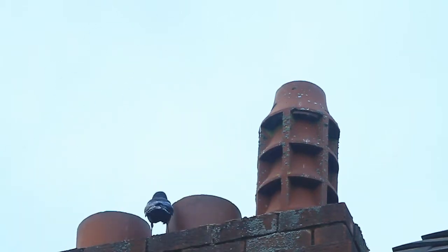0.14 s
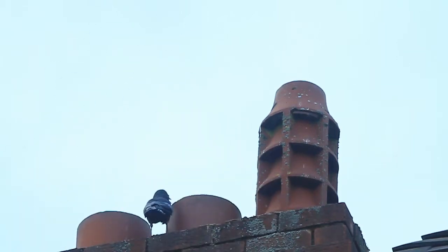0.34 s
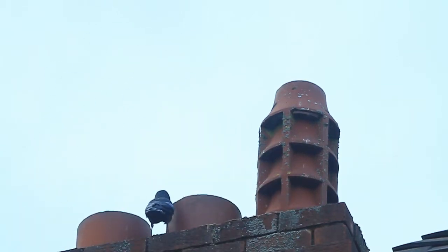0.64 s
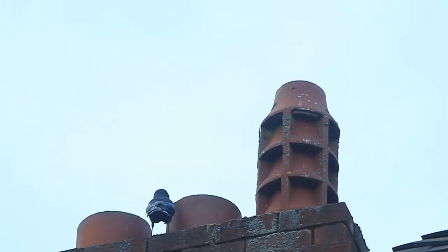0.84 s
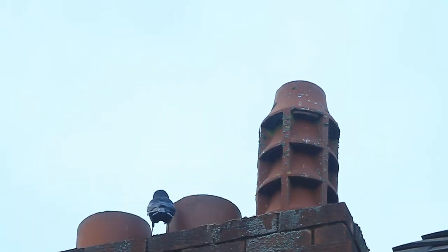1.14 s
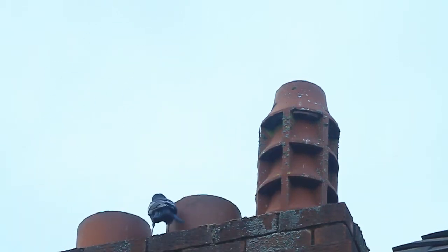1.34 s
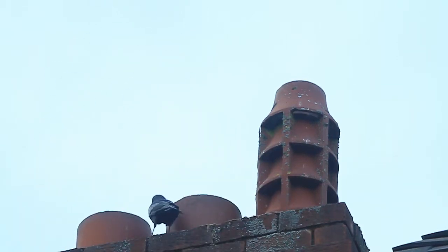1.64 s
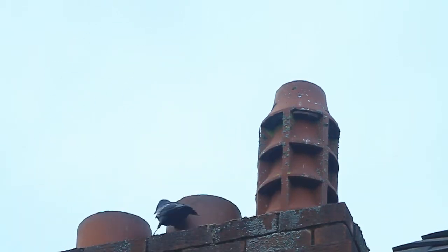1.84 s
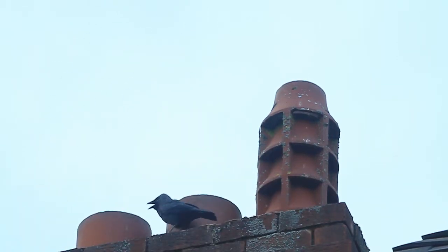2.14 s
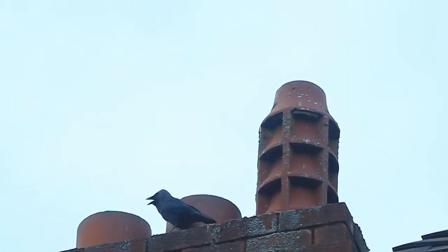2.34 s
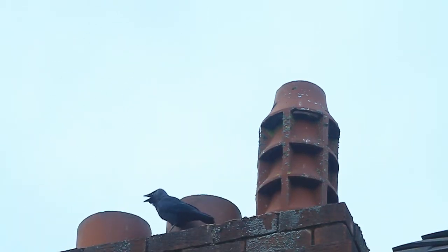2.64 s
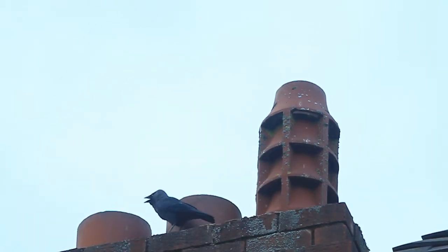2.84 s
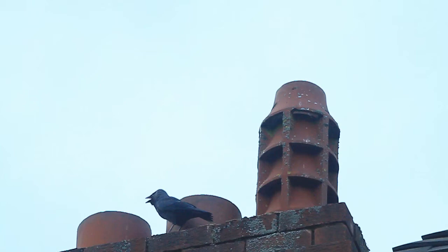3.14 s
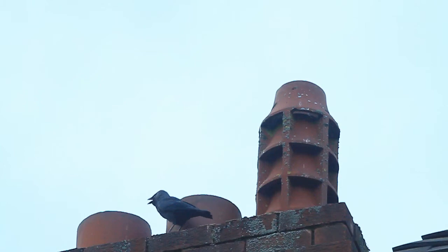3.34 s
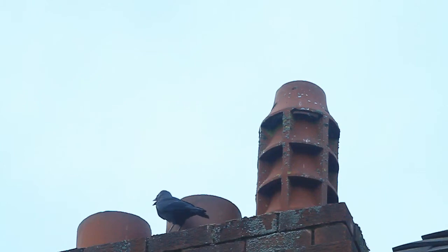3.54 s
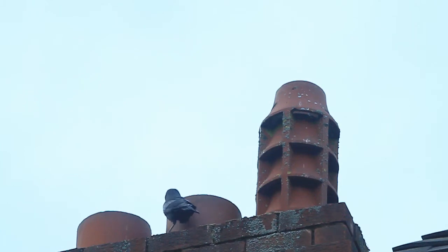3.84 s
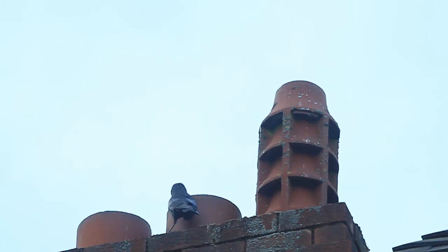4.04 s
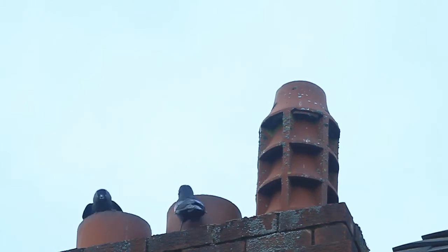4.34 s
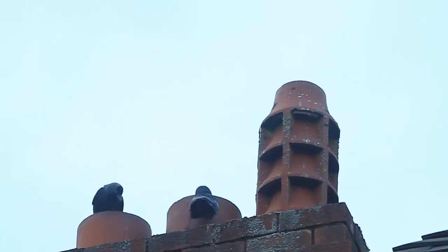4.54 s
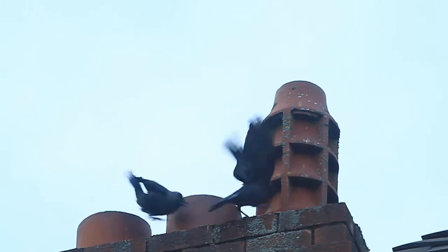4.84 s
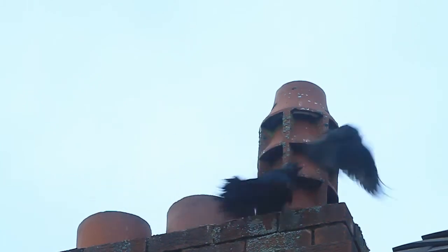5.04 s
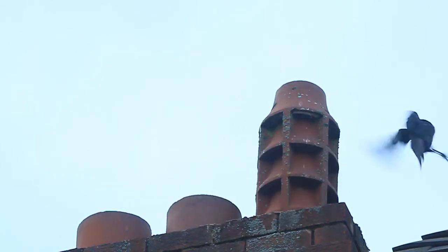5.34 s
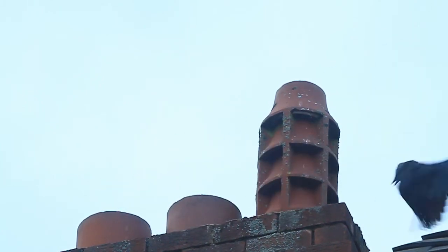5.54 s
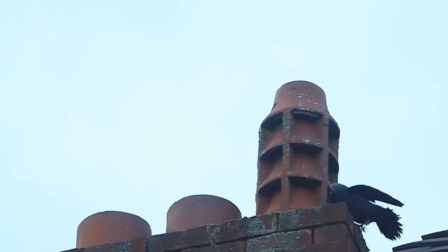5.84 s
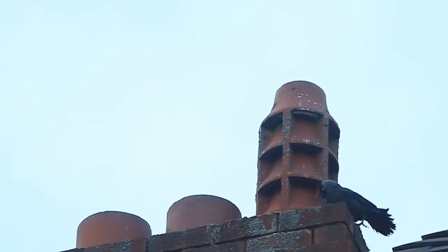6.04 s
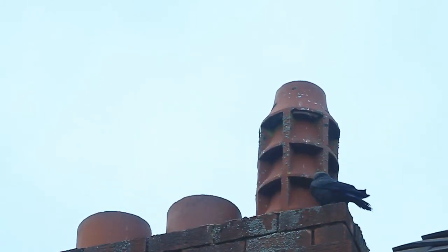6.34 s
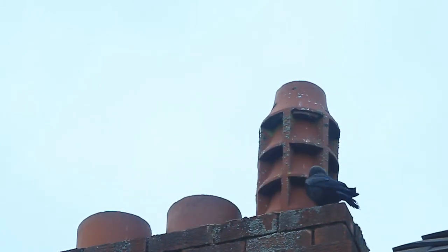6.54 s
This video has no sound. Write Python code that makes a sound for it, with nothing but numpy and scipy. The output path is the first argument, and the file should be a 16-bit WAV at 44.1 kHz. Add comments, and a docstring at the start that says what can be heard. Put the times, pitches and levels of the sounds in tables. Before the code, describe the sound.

Jackdaws squabble on a rooftop chimney. Sharp, fairly close calls plunge in pitch and turn harsh, answered by softer yelps and more distant nasal calls. Small birds whistle far off, mostly at the start, and one soft dull thump sounds early. Later, wings clap and feathers rustle briefly before a last sharp call. House walls add a light echo over a faint town murmur.

```python
"""Jackdaws on a chimney stack

Jackdaws squabble: sharp calls plunge in pitch and turn harsh, answered by softer yelps. Each call is
a pulse train from the syrinx, filtered by throat and beak. There is one dull thump; later, wings clap
and rustle as the birds chase each other off and land. House walls reflect the calls, and small birds
whistle far off over the murmur of a town."""
import sys
import numpy as np
from scipy import signal
from scipy.fft import rfft, irfft
from scipy.io import wavfile
from scipy.ndimage import uniform_filter1d, map_coordinates

SR = 44100
rng = np.random.default_rng(int(sys.argv[2]) if len(sys.argv) > 2 else 0)


def store_pcm(level_fs):
    """Save levels as 16-bit WAV."""
    pcm = np.round(np.clip(level_fs, -1, 1) * 32767).astype(np.int16)
    wavfile.write(sys.argv[1], SR, np.atleast_2d(pcm).T)


N = 294588
TIME = np.arange(N) / SR
CUTOFF_HZ = 15750


def from_db(db):
    """Amplitude ratio of a level in decibels."""
    return 10 ** (np.asarray(db) / 20)


def rms_one(x):
    """Normalisation to unit mean power."""
    return x / np.sqrt(np.mean(x ** 2) + 1e-20)


def colour(x, spectrum, size=4096):
    """Minimum-phase filter by cepstral folding; spectrum rows are (frequency [Hz], gain [dB])."""
    hz, db = np.transpose(spectrum)
    bins_hz = np.fft.rfftfreq(size, 1 / SR)
    gain = from_db(np.interp(np.log(bins_hz + 1), np.log(hz), db))
    cepstrum = irfft(np.log(gain))
    cepstrum[1:size // 2] *= 2
    cepstrum[size // 2 + 1:] = 0
    return signal.fftconvolve(x, irfft(np.exp(rfft(cepstrum))))[:len(x)]


def gliding_colour(x, spectrum, scale):
    """Time warping: filtering on a stretched clock multiplies every resonance by a moving scale."""
    clock = np.cumsum(scale) - scale[0]
    positions = np.interp(np.arange(clock[-1] + 1), clock, np.arange(len(x)))
    stretched = map_coordinates(x, [positions], order=3)
    return map_coordinates(colour(stretched, spectrum), [clock], order=3)


def wobble(count, hz):
    """Random modulation: low-pass noise of unit rms."""
    sos = signal.butter(2, min(hz, SR / 4), fs=SR, output="sos")
    return rms_one(signal.sosfilt(sos, rng.standard_normal(count + SR // 10))[-count:])


def add(out, s, sound):
    """Superposition of a sound at time s."""
    at = int(np.clip(s * SR, 0, N))
    out[at:at + len(sound)] += sound[:N - at]


def town(murmur_db=-51.5, drone_hz=115, drone_db=-68):
    """Far traffic sums incoherently to steady noise, with a faint wavering drone."""
    # traffic spectrum: (frequency [Hz], relative level [dB])
    traffic = [(15, -3.5), (25, -18), (79, -11.5), (113, -13), (173, -9.5), (349, -3.5), (410, -4),
               (722, -11), (848, -8), (2010, -16), (2230, -18), (2420, -19), (6380, -24.5), (7500, -25),
               (15500, -31)]
    murmur = from_db(murmur_db + .2 * wobble(N, hz=4)) * rms_one(colour(rng.standard_normal(N), traffic))
    pitch = drone_hz * (1 + .035 * wobble(N, hz=8))
    drone = np.sin(2 * np.pi * np.cumsum(pitch) / SR)
    return murmur + from_db(drone_db) * rms_one(drone)


def note(length, hz, glide, db, warble=.014):
    """Frequency modulation: a gliding whistle turns into a buzz as its random warble deepens."""
    u = np.linspace(0, 1, int(length * SR))
    pitch = hz * 2 ** (glide * u) * (1 + warble * wobble(len(u), hz=350))
    swell = np.sqrt(2) * signal.windows.tukey(len(u), .6) * (1 + .24 * wobble(len(u), hz=61))
    return from_db(db) * swell * np.sin(2 * np.pi * np.cumsum(pitch) / SR)


def songbirds(pips_start_s=1.6, pip_period_s=.09):
    """Distant song as modulated pure tones: whistles, buzzes and a fading run of pips."""
    # clear notes: (time [s], length [s], start pitch [Hz], glide [octaves], level [dB])
    whistles = [(0, 0.15, 2280, -.2, -46), (0.303, 0.094, 2285, 0, -38.5), (.48, 0.092, 2336, 0.078, -35.5),
                (.785, .046, 2940, 0.01, -39), (0.807, 0.08, 2347, 0, -37.5),
                (0.906, 0.064, 2318, 0, -33.5), (1.216, 0.034, 2200, 0.098, -38),
                (1.386, 0.052, 6900, -0.075, -47), (2.717, 0.1, 4860, -.22, -56),
                (4.4, 0.068, 7230, -0.15, -56), (5.725, 0.19, 2013, -0.0082, -53.5),
                (6.143, 0.059, 4055, 0, -60.5)]
    # buzzy notes: (time [s], length [s], start pitch [Hz], glide [octaves], level [dB],
    # warble [share of pitch])
    buzzes = [(0.074, .11, 5140, .13, -56, 0.022), (0.27, .12, 5740, -0.11, -49, 0.044),
              (0.954, 0.082, 3250, -0.063, -40, .07), (1.079, 0.072, 3270, 0.0078, -34.5, 0.064),
              (1.348, .055, 3430, 0.033, -41.5, .055), (1.62, 0.036, 3720, -.08, -50.5, .012),
              (4.634, .13, 5500, -0.092, -53.5, 0.044), (4.82, .11, 5570, -0.033, -51, 0.042),
              (5.855, .058, 4530, .2, -55.5, .03)]
    out = np.zeros(N)
    for s, *shape in [*whistles, *buzzes]:
        add(out, s, note(*shape))
    for k in range(3):
        add(out, pips_start_s + k * pip_period_s, note(length=.025, hz=2680, glide=0, db=-47.5 - k))
    return out


def syrinx(pitch, slack, jitter, harsh_jitter, rasp_db, harsh_rasp_db, subharmonic, rolloff):
    """A self-oscillating valve emits harmonic pulses, rougher and noisier as its tension slackens."""
    unsteady = (jitter + slack * harsh_jitter) * wobble(len(pitch), hz=570)
    phase = 2 * np.pi * np.cumsum(pitch * (1 + unsteady)) / SR
    pulses = rms_one(sum(np.cos(k * phase) * (k * pitch < CUTOFF_HZ) / k ** (rolloff * (1 - slack))
                         for k in range(1, int(CUTOFF_HZ / pitch.min()))))
    pulses *= 1 + subharmonic * np.cos(phase / 2)  # strong and weak pulses alternate
    hiss = signal.lfilter([1, -.7], [1, -.3], rng.standard_normal(len(pitch)))
    rasp = rms_one(hiss * (1 + np.cos(phase)))  # air passes at each opening
    return pulses + from_db(rasp_db + slack * (harsh_rasp_db - rasp_db)) * rasp


def call(times, hz, db, tract, break_hz, throat_follows, glance, flutter_db,
         attack_s=.002, release_s=.0064, **source):
    """Source-filter model: the syrinx, slack below break_hz, excites the tract. Gives (onset, sound)."""
    t = np.arange(times[0] - attack_s, times[-1] + 4 * release_s, 1 / SR)
    pitch = np.interp(t, times, hz)
    slack = np.clip(2 * (1 - pitch / break_hz), 0, 1)
    # the beak closes as the pitch falls, and the resonances sink with it
    voice = gliding_colour(syrinx(pitch, slack, **source), tract, (pitch / break_hz) ** throat_follows)
    # reflections off pots and brickwork interfere, so the gliding overtones swell and fade
    bricks = rng.standard_normal(SR // 200) * (np.arange(SR // 200) > 30)
    voice += glance * np.convolve(voice, bricks / np.linalg.norm(bricks))[:len(t)]
    voice /= np.sqrt(uniform_filter1d(voice ** 2, size=260) + 1e-12)  # hold the power steady
    attack = np.clip((t - t[0]) / (2 * attack_s), 0, 1)
    release = np.exp(-np.maximum(t - times[-1], 0) / release_s)
    level_db = np.interp(t, times, db) + flutter_db * wobble(len(t), hz=98)
    return t[0], voice * attack * release * from_db(level_db)


def jackdaws(calls, gesture, throat, formant_hz=1480, width_octaves=.37, **voice):
    """Formant shaping: each call's beak setting tilts the spectrum and boosts the low resonance."""
    out = np.zeros(N)
    hz, db = np.transpose(throat)
    octaves = np.log2(hz / formant_hz)
    formant = np.exp(-(octaves / width_octaves) ** 2)
    for *row, tilt, boost_db in calls:
        tract = np.column_stack([hz, db + tilt * octaves + boost_db * formant])
        add(out, *call(*gesture(*row), tract, **voice))
    return out


def yelps(swell_db=2):
    """Fast exponential downglides that swell and are cut short, from birds facing away."""
    # yelps: (time [s], length [s], start pitch [Hz], fall [octaves/s], level [dB],
    # tilt [dB/octave], boost [dB])
    calls = [(.039, 0.024, 1343, 14.6, -35, -1, -2.5), (.848, 0.026, 1292, 8.5, -33, -1, -5),
             (1.242, 0.033, 1365, 12.4, -34.5, 1, 0.5), (3.035, 0.024, 1433, 17.5, -35.5, 1.5, 0),
             (3.573, 0.0298, 1282, 10.7, -42, 1.8, 4), (3.722, 0.026, 1344, 13, -37, -0.5, 1),
             (6.664, .026, 1084, 1.9, -39.5, -6, 0)]
    # throat and beak response from behind: (frequency [Hz], gain [dB])
    throat = [(400, -18), (800, -16.5), (1250, -4.5), (1700, 8), (2350, 5), (3100, -5.5), (4100, -6.5),
              (5100, 0), (6300, -7), (7600, -13), (12000, -15.5), (14500, -80)]

    def gesture(s, length, hz, fall, db):
        t = np.linspace(0, length, 50)
        return s + t, hz * 2 ** (-fall * t), db - swell_db * (1 - t / length) ** 2

    return jackdaws(calls, gesture, throat, break_hz=1320, throat_follows=.068, glance=.8,
                    flutter_db=1.5, jitter=.009, harsh_jitter=.01, rasp_db=-10, harsh_rasp_db=-4,
                    subharmonic=.1, rolloff=.11)


def caws(rise_s=.018, rise_octaves=.2, rise_db=13, fall_octaves=1.05, fade_db=15):
    """Coupled frequency and amplitude modulation: a "kya" scoops up, then sinks and fades."""
    # arched calls: (time [s], length [s], top pitch [Hz], level [dB], tilt [dB/octave], boost [dB])
    calls = [(.158, 0.089, 627, -22, -0.59, 0.68), (.997, .084, 649, -22, 0.19, -0.64),
             (3.233, .086, 653.3, -26, 1.1, -1.7)]
    # throat and beak response: (frequency [Hz], gain [dB])
    throat = [(400, -39), (900, -21.5), (1250, -13), (1900, -10.5), (2500, 4.5), (3100, -15), (4400, -30),
              (5500, -10), (6600, -20.5), (7800, -22), (9400, -24.5), (12000, -23.5), (14500, -43)]

    def gesture(s, length, hz, db):
        t = np.linspace(0, length, 200)
        early = np.clip(1 - t / rise_s, 0, 1) ** 2
        spent = np.clip((t - rise_s) / (length - rise_s), 0, 1)
        octaves = -rise_octaves * early - fall_octaves * spent ** 1.5
        return s + t, hz * 2 ** octaves, db - rise_db * early - fade_db * spent ** 2.36

    return jackdaws(calls, gesture, throat, break_hz=592, throat_follows=.22, glance=.34,
                    flutter_db=-1, jitter=.009, harsh_jitter=.014, rasp_db=-8, harsh_rasp_db=2,
                    subharmonic=.039, rolloff=.034)


def drawls(arch_db=5.5):
    """Slow exponential downglides under an arched envelope: nasal calls from further off."""
    # drawn-out calls: (time [s], length [s], start pitch [Hz], fall [octaves/s], level [dB],
    # tilt [dB/octave], boost [dB])
    calls = [(.378, 0.1, 675.6, 6.1, -38, 3, -5), (.47, 0.13, 518, 1.7, -37.5, 3.5, -10),
             (.895, 0.16, 517, 2.3, -36.5, 2, -2), (2.31, 0.047, 723, 8, -55.5, 8, -6),
             (3.066, 0.094, 621.4, 6.2, -42.5, -3.5, -2), (3.75, 0.066, 852, 4.4, -42.5, -2, 10),
             (4.865, 0.059, 756, 1.1, -54, 12.5, -10)]
    # throat and beak response: (frequency [Hz], gain [dB])
    throat = [(400, -37), (1200, -8.5), (1650, -1), (2050, 5), (2700, -7), (3400, -10), (4400, -21.5),
              (5200, -20.5), (7000, -34.5), (14000, -51)]

    def gesture(s, length, hz, fall, db):
        t = np.linspace(0, length, 50)
        return s + t, hz * 2 ** (-fall * t), db - arch_db * (2 * t / length - 1) ** 2

    return jackdaws(calls, gesture, throat, break_hz=520, throat_follows=.02, glance=1,
                    flutter_db=1, jitter=.012, harsh_jitter=.004, rasp_db=-3, harsh_rasp_db=-1,
                    subharmonic=.2, rolloff=.05, attack_s=.006)


def tchaks(swell_db_per_s=405, break_s=.012, drop_octaves=.41, dip_db=5, plunge_octaves=1.3, fade_db=11):
    """A voice break: a tense note swells, cracks, and plunges as the breath runs out."""
    # sharp calls: (break time [s], clear length [s], break pitch [Hz], sag [octaves/s],
    # clear level [dB], harsh level [dB], harsh length [s], tilt [dB/octave], boost [dB])
    calls = [(.645, 0.023, 1308, 3.5, -17.5, -20, 0.063, 0.1, 1),
             (1.45, 0.022, 1301, 5, -13.5, -19.5, 0.067, -0, -1.5),
             (2.783, .021, 1298, 6, -16.5, -20, 0.062, 0.86, -3),
             (4.479, .02, 1294, 5, -13, -18, .054, -0.4, 6.5),
             (6.505, 0.013, 1458, -12.5, -24, -25, 0.071, -0.2, 5.5)]
    # throat and beak response: (frequency [Hz], gain [dB])
    throat = [(400, -38), (900, -19), (1350, -12.5), (1650, -4.5), (2050, -3), (2680, 4.5), (3200, -10.5),
              (4400, -18.5), (5400, -11.5), (6600, -13.5), (7800, -20), (9400, -21.5), (12000, -24.5),
              (14500, -48)]

    def gesture(s, clear_s, hz, sag, clear_db, harsh_db, harsh_s):
        t = np.linspace(-clear_s, harsh_s, 200)
        before = np.minimum(t, 0)
        crack = np.clip(t / break_s, 0, 1)
        spent = np.clip(t / harsh_s, 0, 1)
        octaves = -sag * before - drop_octaves * crack - plunge_octaves * spent ** 1.7
        db = (1 - crack) * clear_db + crack * harsh_db + swell_db_per_s * before
        db -= dip_db * np.sin(np.pi * crack) + fade_db * spent ** 2.5
        return s + t, hz * 2 ** octaves, db

    return jackdaws(calls, gesture, throat, break_hz=1310, throat_follows=.056, glance=.74,
                    flutter_db=.5, jitter=.01, harsh_jitter=.01, rasp_db=-11, harsh_rasp_db=0,
                    subharmonic=.017, rolloff=.28)


def thump(contact_s=.0012):
    """Modal ringing: a soft blow lands in two touches and excites a few damped low modes."""
    # contacts: (time [s], level [dB])
    touches = [(.829, -44), (.858, -40)]
    # resonances: (frequency [Hz], relative level [dB], 60 dB decay time [s])
    modes = [(99, -1.5, 0.12), (184, -4, 0.12), (256, 2, 0.057), (347, -6, 0.36), (500.6, 0, 0.18)]
    out, t = np.zeros(N), TIME[:SR // 2]
    ring = sum(from_db(db - 60 * t / t60) * np.sin(2 * np.pi * hz * t) for hz, db, t60 in modes)
    for s, db in touches:
        add(out, s, from_db(db) * ring * (1 - np.exp(-t / contact_s)))
    return out


def rustle(takeoff_s=5.17, landed_s=5.77, flight_db=-47.5, wingbeat_hz=6.3):
    """Friction of feathers: grainy noise builds to take-off, pulses with the wingbeats and fades."""
    # wings brush the pots on opening and fold on landing: (time [s], level [dB], half length [s])
    brushes = [(4.882, -51.5, 0.033), (5.904, -52, 0.028), (5.965, -52, 0.016)]
    # feather noise spectrum: (frequency [Hz], relative level [dB])
    feathers = [(400, 0.5), (1500, 1.5), (3500, 0), (7000, -2.5), (12000, 3.5), (15500, -4)]
    rise, fade, settle = 72, 19, 307  # dB/s
    t = TIME - takeoff_s
    level_db = flight_db + np.minimum(rise * t, -fade * t) + np.cos(2 * np.pi * wingbeat_hz * t)
    level_db -= settle * np.maximum(TIME - landed_s, 0)
    brushing = sum(from_db(db) * np.exp(-((TIME - s) / half) ** 2) for s, db, half in brushes)
    grains = rng.standard_normal(N) * from_db(3.5 * wobble(N, hz=150))
    return rms_one(colour(grains, feathers)) * (from_db(level_db) + brushing)


def wing_claps(rise_s=.001):
    """Impact noise: wing tips meet and radiate short broadband bursts."""
    # wing strikes: (time [s], level [dB], length [s])
    claps = [(5.113, -37.5, 0.0091), (5.14, -38, 0.0091), (5.157, -31, 0.0099), (5.165, -36, 0.02),
             (5.267, -36.5, .012), (5.625, -41.5, 0.0094)]
    # clap spectrum: (frequency [Hz], relative level [dB])
    spectrum = [(120, -24.5), (200, -4), (414, 2), (641, -7), (1330, -6), (2510, -17), (3070, -1.5),
                (6830, -9), (11800, -0.5), (15500, -6.5)]
    envelope, t = np.zeros(N), TIME[:SR // 10]
    for s, db, length in claps:
        add(envelope, s, from_db(db) * np.minimum(t / rise_s, 1) * np.exp(-(t / length) ** 2))
    return envelope * rms_one(colour(rng.standard_normal(N), spectrum))


def rooftops(x, walls_db, near_db, far_db, near_t60=.48, far_t60=2.23, first_s=.024):
    """Reverberation: discrete wall echoes, quick scatter from roofs and a long tail down the street."""
    # wall reflections: (delay [s], relative level [dB])
    walls = [(0.022, -16.5), (0.045, -24.5), (0.045, -46), (0.078, -37)]
    # filter on all echoes: (frequency [Hz], gain [dB])
    street = [(300, -6), (1300, 5), (2500, -3.5), (3800, -6.5), (6000, -1.5), (10000, -1.5), (15000, -2)]
    response, t = np.zeros(SR), TIME[:SR]
    for delay, db in walls:
        response[int(delay * SR)] += from_db(db + walls_db)
    for db, t60 in (near_db, near_t60), (far_db, far_t60):
        scatter = rng.standard_normal(SR) * from_db(-60 * t / t60) * (t > first_s)
        response += from_db(db) * scatter / np.linalg.norm(scatter)
    return x + signal.fftconvolve(x, colour(response, street))[:N]


def spread(x):
    """Mid-side decorrelation: two close points receive nearly the same; the treble differs most."""
    # side signal against mid: (frequency [Hz], level [dB])
    width = [(50, -23), (500, -36.5), (2500, -54), (5000, -36), (9000, -32), (14000, -18.5)]
    smear = rng.standard_normal(SR // 100)
    side = colour(signal.fftconvolve(x, smear / np.linalg.norm(smear))[:N], width)
    return np.array([x + side, x - side])


def scene():
    """Superposition of the birds, their echoes and the town; a level difference sets the birds right."""
    near_calls = tchaks() + caws()
    averted_calls, far_calls = yelps(), drawls()
    birds = rooftops(near_calls, walls_db=6, near_db=-11.5, far_db=-28)
    birds += rooftops(averted_calls, walls_db=10, near_db=-3, far_db=-10)
    birds += rooftops(far_calls, walls_db=2, near_db=-11, far_db=-2.5)
    birds += rooftops(songbirds(), walls_db=10, near_db=-3, far_db=-8.5)
    birds += rooftops(thump() + wing_claps() + rustle(), walls_db=0, near_db=-10, far_db=-26)
    return spread(birds) * from_db([[-.3], [.3]]) + spread(town())


def record(dry):
    """Band limiting: an elliptic low-pass cuts the top steeply."""
    return signal.sosfilt(signal.ellip(12, .1, 80, CUTOFF_HZ, fs=SR, output="sos"), dry)


dry = scene()
out = record(dry)
store_pcm(out)
```